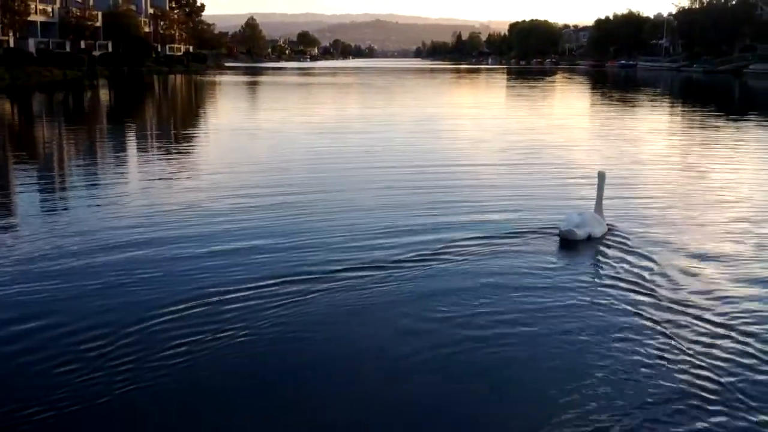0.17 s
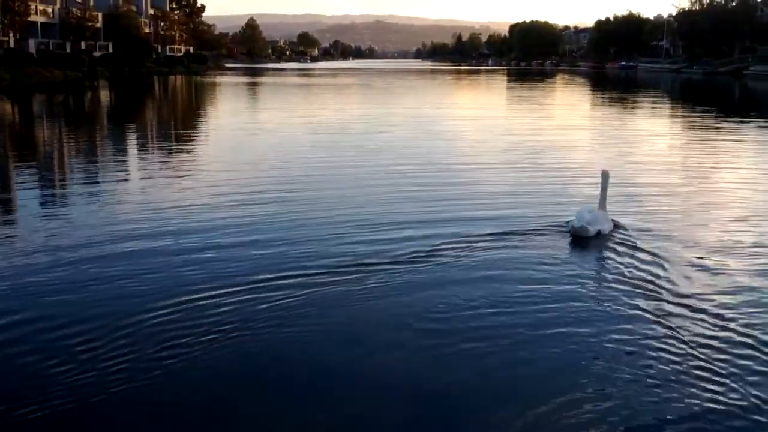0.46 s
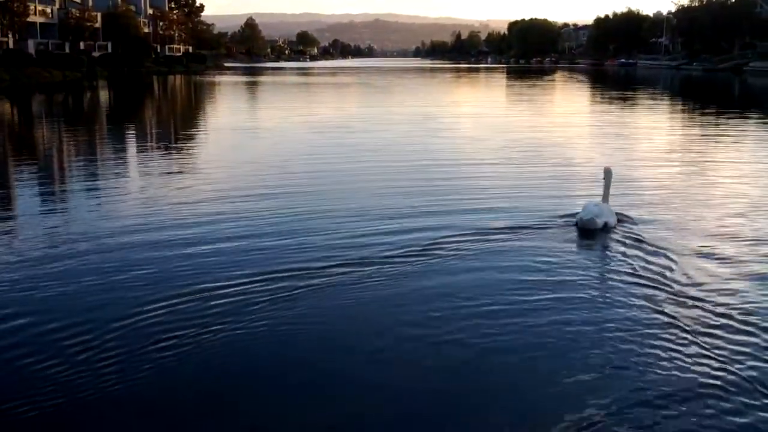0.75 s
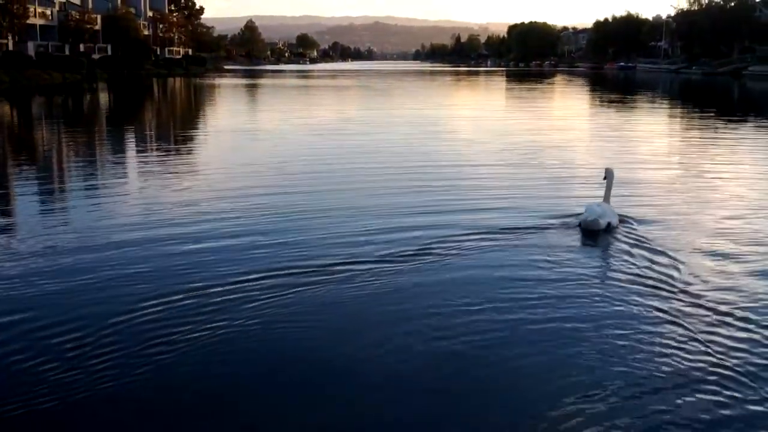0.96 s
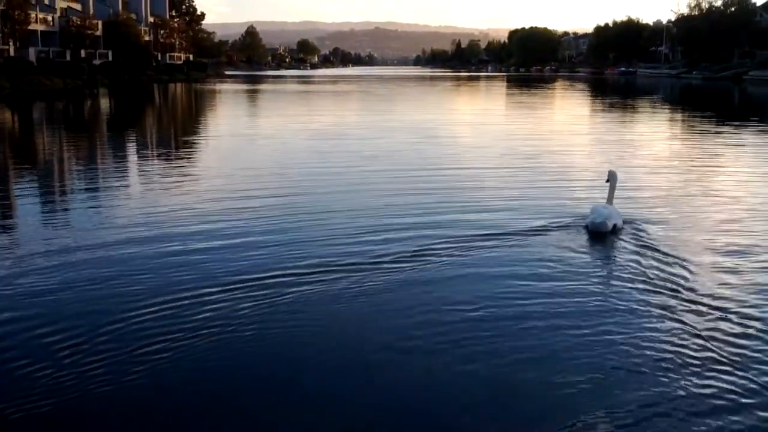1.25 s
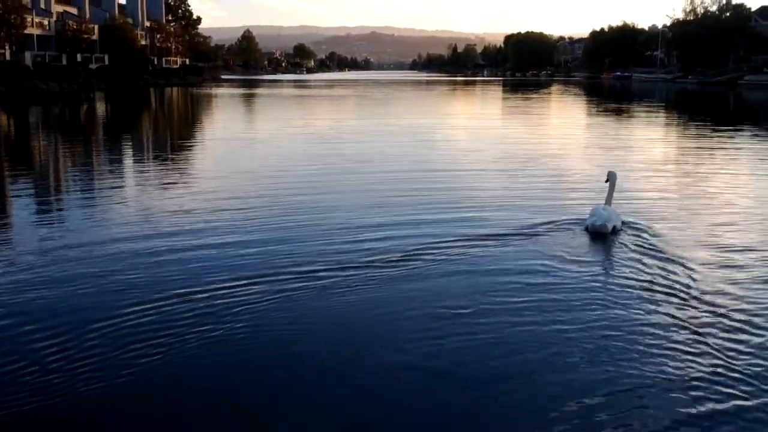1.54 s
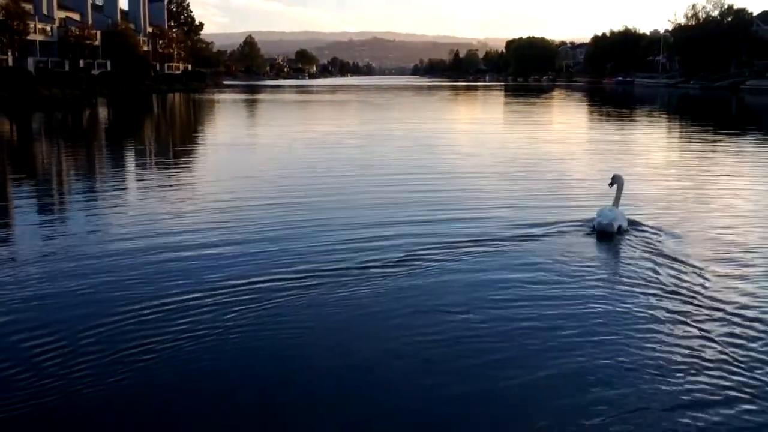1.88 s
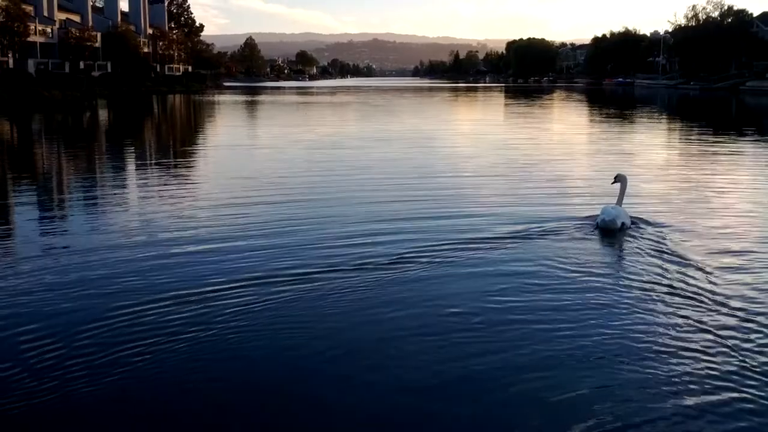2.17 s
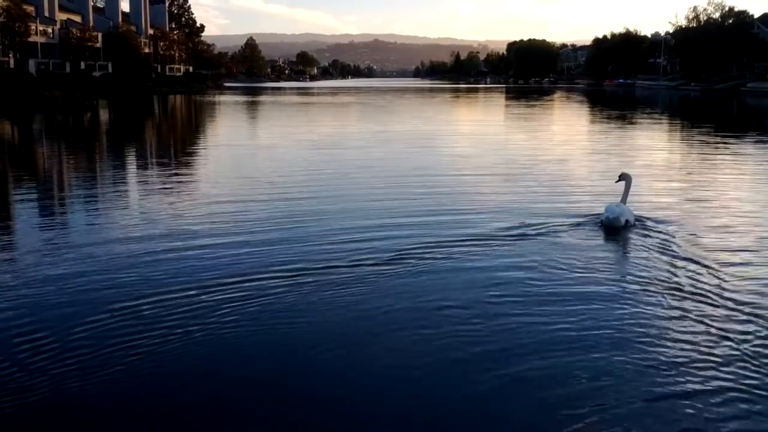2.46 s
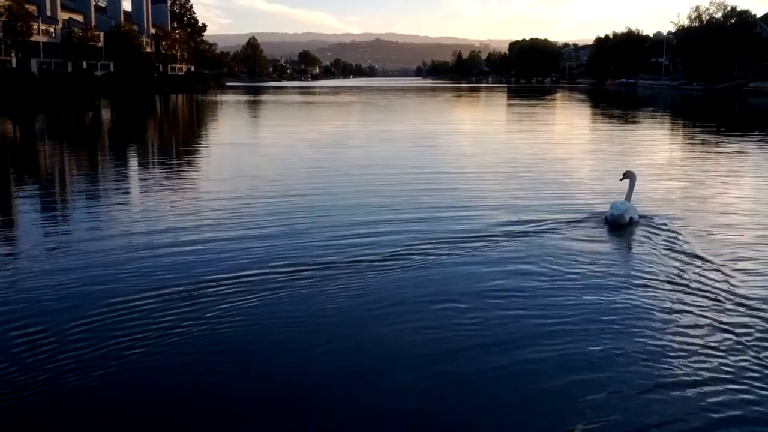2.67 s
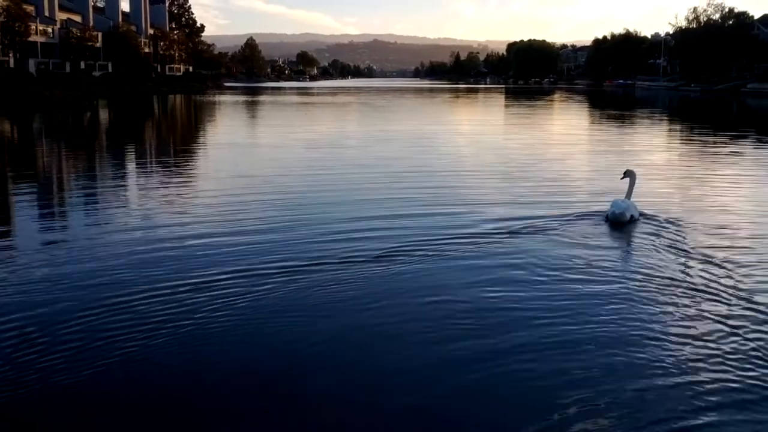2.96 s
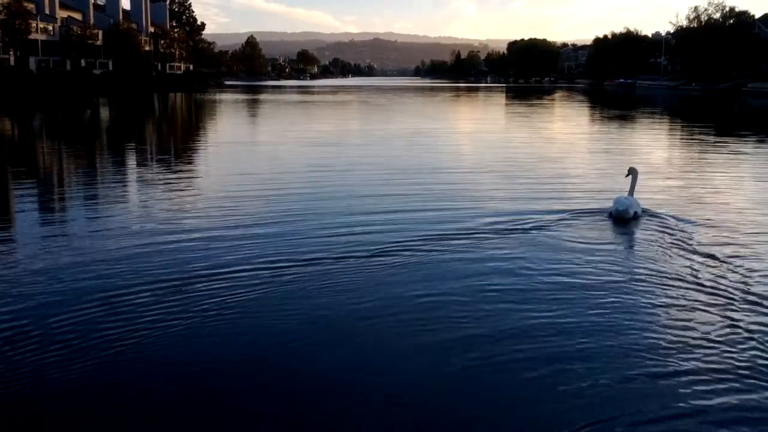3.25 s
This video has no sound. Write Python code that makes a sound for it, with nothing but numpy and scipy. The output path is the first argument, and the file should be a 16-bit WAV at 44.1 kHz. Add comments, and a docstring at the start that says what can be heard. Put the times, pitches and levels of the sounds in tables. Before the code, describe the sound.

A swan's single short grunt, a low nasal croak of about eight quick throaty pulses, sounds from 1.87 to 2.05 seconds, with faint hissy breath and a weak echo off the banks. Tiny distant birds chirp around 0.7, 1.0, 1.3, 2.7 and 3.1 to 3.2 seconds; a minute water tick falls near 1.06. Quiet low town rumble swells slightly under thin steady hiss throughout.

```python
"""A calm lake: a swan gives one short grunt, a few slow flaps of its voice ringing the long throat,
with faint hisses around it and echoes from the near bank and the shore.
Small birds chirp far off as gliding whistled tones, and the water ticks once in a decaying noise burst.
A distant town rumbles in shaped noise, with a low drone and a few swells, under a thin steady hiss."""
import sys
import numpy as np
from scipy import signal
from scipy.fft import rfft, irfft
from scipy.io import wavfile
from scipy.ndimage import uniform_filter1d

SR = 44100
rng = np.random.default_rng(int(sys.argv[2]) if len(sys.argv) > 2 else 0)


def master_out(mix):
    """Clip the mix to full scale and print it as 16-bit PCM to the path in sys.argv[1]."""
    frames = np.transpose(np.atleast_2d(mix))
    ceiling = np.clip(frames, -1, 1)
    pcm = np.round(ceiling * 32767).astype(np.int16)
    wavfile.write(sys.argv[1], SR, pcm)


N = 150822

JOIN_HZ = 1700  # the town's noise lies below, the steady hiss above


def undb(db):
    """Amplitude ratio: 20 decibels are a factor of ten."""
    return 10 ** (np.asarray(db) / 20)


def unit(x):
    """Normalisation: scale to rms 1."""
    return x / np.sqrt(np.mean(x ** 2))


def noise():
    """White noise: independent Gaussian samples have equal mean power at all frequencies."""
    return rng.standard_normal(N)


def ring(x, hz, width_hz):
    """Resonance: two equal filters in cascade give gain 1 at the centre and steep skirts."""
    centre_hz = min(hz, .45 * SR)
    b, a = signal.iirpeak(centre_hz, hz / min(width_hz, .4 * SR), fs=SR)
    once = signal.lfilter(b, a, x + 1e-18)  # the tiny offset avoids denormal numbers
    return signal.lfilter(b, a, once)


def walk(rate):
    """Random modulation: held random steps, `rate` a second, smoothed twice and scaled to rms 1."""
    k = int(SR / rate)
    steps = np.repeat(rng.standard_normal(N // k + 1), k)
    smooth = uniform_filter1d(uniform_filter1d(steps, k), k)
    return unit(smooth[:N])


def coloured(points, lo, hi):
    """Spectral shaping: white noise weighted by a curve in dB over log frequency, from lo to hi."""
    f = np.maximum(np.fft.rfftfreq(N, 1 / SR), 1)
    hz, db = np.array(points).T
    gain = undb(np.interp(np.log(f), np.log(hz), db))
    band = (f > lo) * (f <= hi)
    return unit(irfft(rfft(noise()) * gain * band, N))


def swell(t, at, length, hz, width_hz, db):
    """Amplitude modulation: a noise band under a half-cosine envelope centred on `at`."""
    envelope = np.cos(np.pi * np.clip((t - at) / length, -.5, .5))
    return undb(db) * envelope * unit(ring(noise(), hz, width_hz))


def town_rumble(t):
    """Broadband noise: a distant town, strongest at low frequencies, its level wandering slightly."""
    # spectrum of the town: hz, relative_db (per Hz)
    town_spectrum = [(12, -51), (20, 0), (44, -2), (65, -1.5), (138, -4), (183, -11), (237, -11.5),
                     (307, -17), (480, -20.5), (568, -25), (904, -23), (1700, -32), (2210, -63),
                     (3740, -120)]
    level_db = -47 + .5 * walk(2.89)
    return undb(level_db) * coloured(town_spectrum, 9.3, JOIN_HZ)


def drone():
    """Narrow-band noise: a low resonance turns white noise into a drone of unsteady level."""
    return undb(-56) * unit(ring(noise(), hz=52.6, width_hz=18.3))


def rumble_swells(t):
    """Amplitude modulation: bands of the distant rumble rise and fall smoothly."""
    # swells of the rumble: centre_s, length_s, centre_hz, width_hz, peak_level_db
    rumble_bands = [(0.672, 0.14, 73, 40, -45.5), (1.595, 1, 318, 242, -59), (1.99, 0.25, 49.4, 40, -45.5),
                    (3.08, 0.3, 85, 79, -52)]
    return sum(swell(t, *row) for row in rumble_bands)


def air_hiss():
    """Stationary noise: a thin hiss of fixed spectrum and level."""
    # spectrum of the hiss: hz, relative_db (per Hz)
    air_spectrum = [(1000, -29), (1700, 1), (2290, -2.5), (2700, -4), (3430, -4.5), (5550, -5.5),
                    (7530, -7.5), (9670, -6.5), (15500, -10.5)]
    return undb(-64) * coloured(air_spectrum, JOIN_HZ, SR / 2)


def chirps(t):
    """Frequency modulation: each whistled tone starts level, flicks to its top pitch and glides on to its end."""
    # whistled tones, often two at once: top_s, rise_s, fall_s, start_hz, top_hz, end_hz, peak_level_db
    tones = [(.673, .012, .012, 5450, 5550, 5400, -70), (.700, .008, .016, 5400, 5500, 5200, -64.5),
             (.978, .030, .018, 3720, 4120, 3650, -57.5), (.976, .030, 0.031, 3320, 3430, 3000, -64),
             (1.019, .007, 0.0036, 3620, 4130, 4150, -55), (1.028, .008, .012, 4150, 4300, 4000, -68),
             (1.030, .010, .008, 4600, 4800, 4700, -66), (1.281, 0.02, 0.021, 4060, 4830, 3820, -57.5),
             (2.730, 0.028, 0.037, 3500, 3700, 2840, -60.5), (2.733, .012, .014, 3950, 4280, 4050, -63),
             (2.778, .011, .012, 4150, 4330, 4200, -64), (2.778, 0.0099, .009, 4600, 4780, 4650, -66),
             (3.058, .012, .022, 5830, 5970, 5400, -66), (3.102, .008, .008, 5850, 5950, 5850, -65),
             (3.234, 0.054, 0.024, 3780, 4330, 3550, -54), (3.224, .052, 0.021, 4060, 4320, 4200, -57.5)]
    waver, knee, fall_curve = .0078, .3, 1.2  # rms pitch ratio, fraction of the rise, exponent
    out = np.zeros(N)
    for at, rise, fall, start_hz, top_hz, end_hz, db in tones:
        # u runs from -1 at the start through 0 at the top to 1 at the end
        u = np.clip((t - at) / np.where(t < at, rise, fall), -1, 1)
        up = start_hz + (top_hz - start_hz) * np.exp(-(u / knee) ** 2)
        down = top_hz + (end_hz - top_hz) * abs(u) ** fall_curve
        hz = np.where(u < 0, up, down) * (1 + waver * walk(400))
        phase = 2 * np.pi * np.cumsum(hz) / SR
        out += undb(db) * np.cos(np.pi * u / 2) * np.sin(phase)
    return out


def tick(t):
    """Transient: one tiny tick of water, a sudden burst of bright noise that dies exponentially."""
    start_s, decay_s = 1.0604, .0026
    envelope = (t > start_s) * np.exp(-abs(t - start_s) / decay_s)
    return undb(-54.5) * envelope * unit(ring(noise(), hz=8500, width_hz=12000))


def hisses(t):
    """Band-limited noise: faint smooth puffs of hiss around the grunt."""
    # hisses: centre_s, length_s, centre_hz, width_hz, peak_level_db
    hiss_bands = [(1.835, .07, 6200, 1800, -68), (1.84, .08, 8800, 2500, -71),
                  (1.971, .08, 8600, 4000, -66.5), (2.031, 0.07, 8960, 2480, -64)]
    return sum(swell(t, *row) for row in hiss_bands)


def snap(age, when):
    """Band-limited impulse: a sinc pulse, cut ten samples either side of its centre."""
    return np.sinc((age - when) * SR) * (abs(age - when) * SR < 10)


def grunt(t):
    """Source and filter: each flap snaps open, passes a puff of air and shuts; throat resonances ring."""
    # flaps of the voice, levels relative:
    # start_s, level_db, first_resonance_hz, second_resonance_db, third_resonance_db, upper_resonances_db
    flaps = [(1.8651, -3.5, 866, -6, -17, -20), (1.8862, 0.5, 894, -1.5, -19, -14.5),
             (1.9075, -1.5, 895, -0.5, -17, -11), (1.9287, -0.5, 900, -1, -13, -11),
             (1.9500, 0.5, 875, -6, -12, -10), (1.9726, 0.5, 880, -11, -5, -9.5),
             (2.0014, -2.5, 810, -25, -16, -21), (2.0230, -13, 755, -17, -11, -5.5)]
    # upper throat resonances: centre_hz, width_hz, relative_db
    upper_resonances = [(2280, 300, 2), (3520, 480, -1.5), (4660, 340, -6), (5400, 430, -9)]
    close_s, close_db = .0055, -13.5  # the flap shuts more softly than it opens
    puff_s = .0076
    puff_db, puff_db_per_oct = -6.5, 4.5  # puff level at the first resonance, and its slope
    out = np.zeros(N)
    for at, db, first_hz, second_db, third_db, upper_db in flaps:
        age = t - at
        snaps = snap(age, 0) + undb(close_db) * snap(age, close_s)
        opening = np.maximum(np.sin(np.pi * np.clip(age / puff_s, 0, 1)), 0)
        puff = noise() * np.sqrt(opening)
        puff = puff / np.linalg.norm(puff)
        throat = [(378, 103, -7.5),  # centre Hz, width Hz, dB; the lowest is the body's
                  (first_hz, 190, 0),
                  (1045, 290, -9),  # shoulder above the first
                  (1980, 200, second_db),
                  (2720, 310, third_db)]
        throat += [(hz, width, d + upper_db) for hz, width, d in upper_resonances]
        for hz, width, d in throat:
            airiness = undb(puff_db + puff_db_per_oct * np.log2(hz / first_hz))
            rung = ring(snaps + airiness * puff, hz, width)
            out += undb(db + d) * rung / np.linalg.norm(rung)
    return undb(-23) * out


def shore(x, t):
    """Reverberation: diffuse echo from water and banks, by convolution with decaying noise."""
    t60_s, delay_s = .77, .017
    tail = noise() * np.exp(-np.log(1000) * t / t60_s) * (t > delay_s)
    return signal.fftconvolve(x, tail / np.linalg.norm(tail))[:N]


def bank_echo(swan, t):
    """Specular reflection: the near bank returns one delayed, weaker copy of the swan."""
    delay_s = .17
    return undb(-22) * np.interp(t - delay_s, t, swan)


def scene():
    """Superposition: background, birds, tick, swan and echoes add over the lake."""
    t = np.arange(N) / SR
    background = town_rumble(t) + drone() + rumble_swells(t) + air_hiss()
    birds = chirps(t)
    swan = grunt(t) + hisses(t)
    echo = shore(undb(-10.5) * swan + undb(-12.5) * birds, t)
    return (background + birds + tick(t) + swan + bank_echo(swan, t) + echo)[None]


def record(dry):
    """Low-pass filtering: the recorder cuts steeply above 15.7 kHz."""
    top_cut = signal.ellip(10, .1, 70, 15700, fs=SR, output="sos")
    return signal.sosfilt(top_cut, dry)


dry = scene()
out = record(dry)
master_out(out)
```